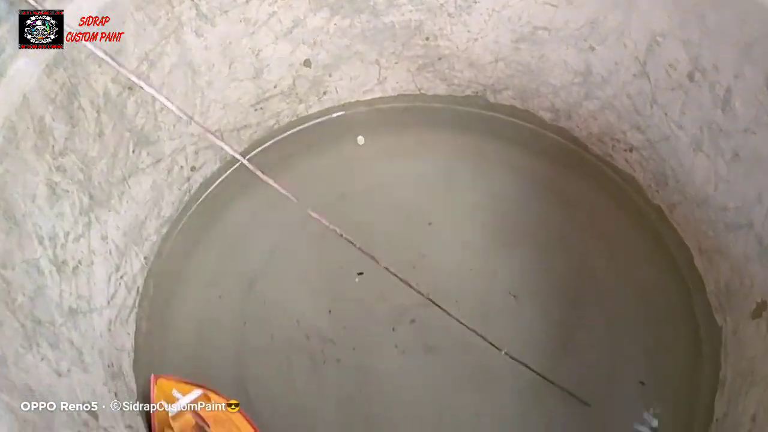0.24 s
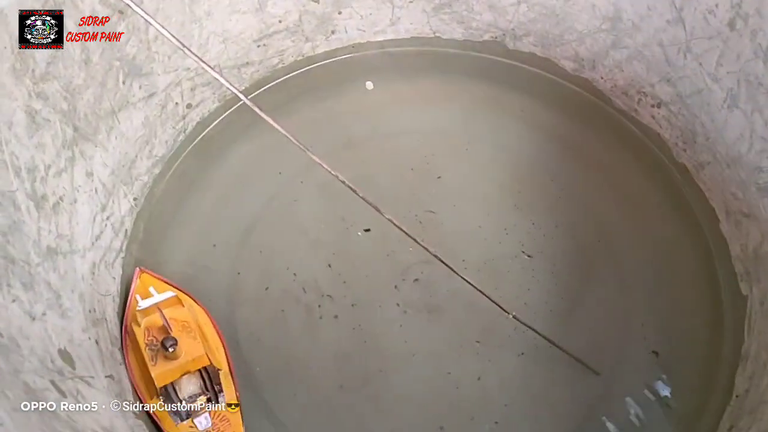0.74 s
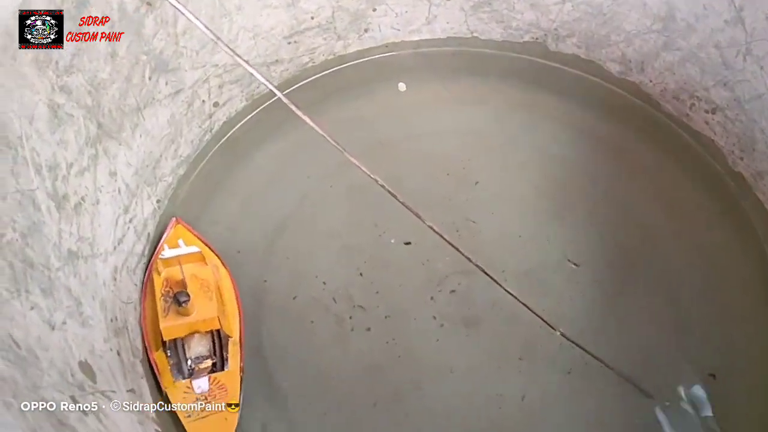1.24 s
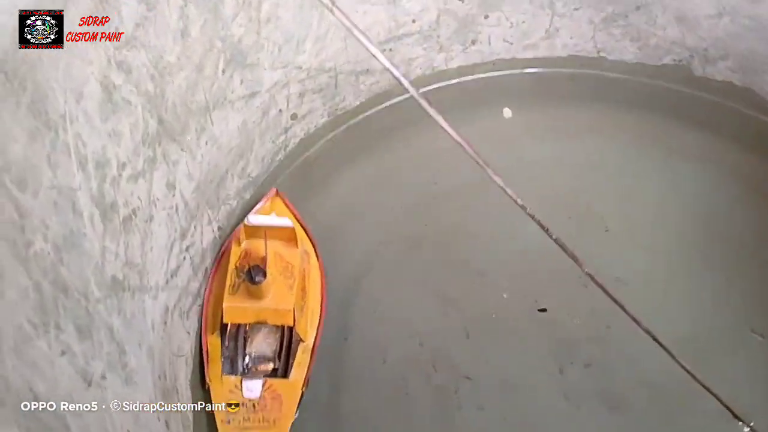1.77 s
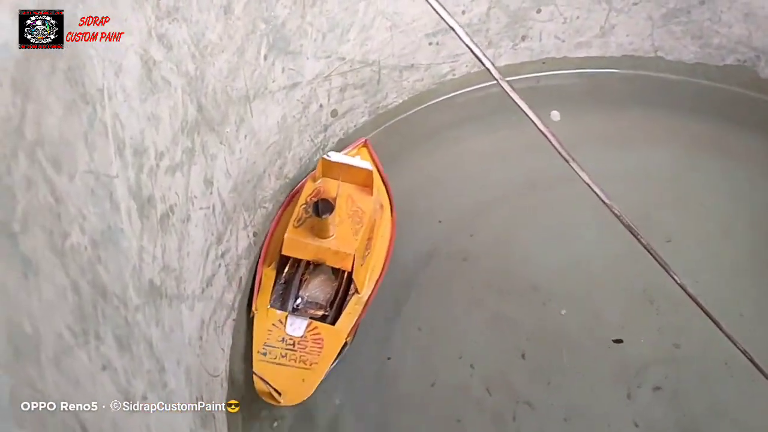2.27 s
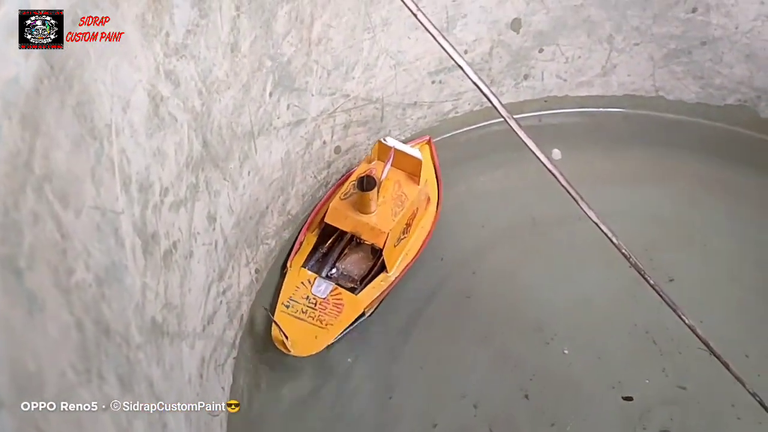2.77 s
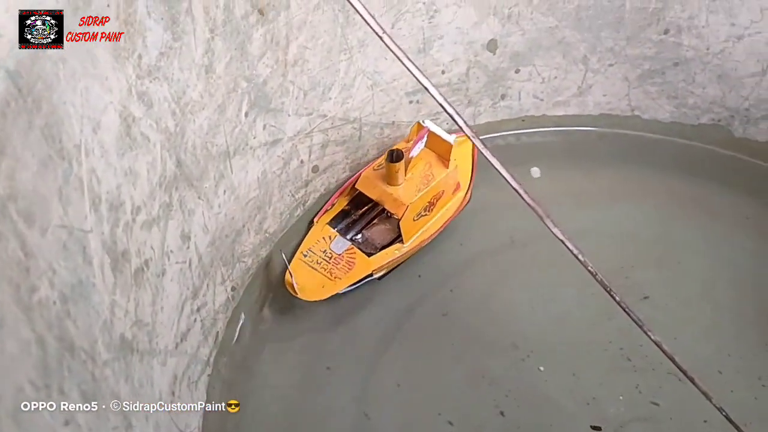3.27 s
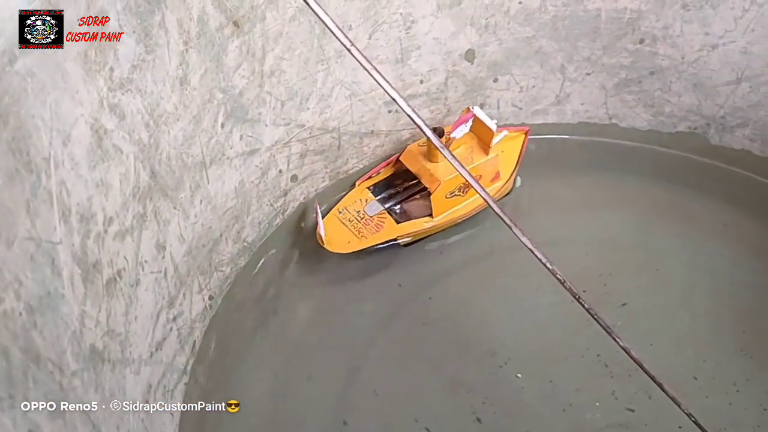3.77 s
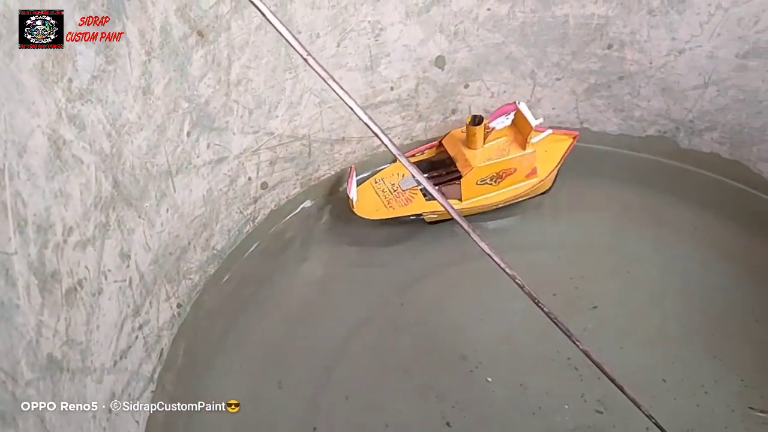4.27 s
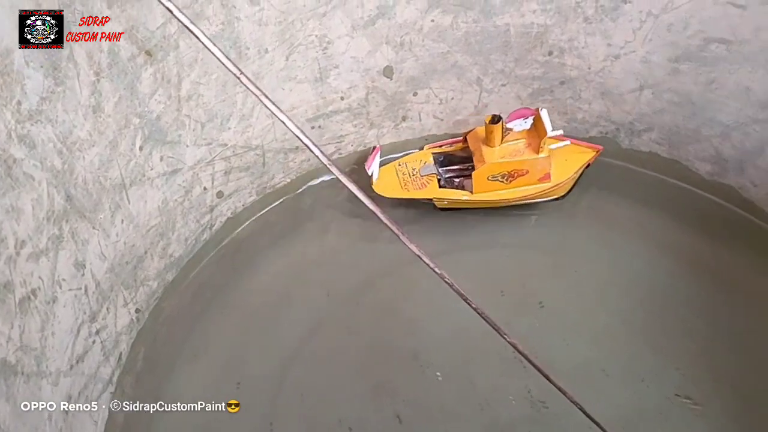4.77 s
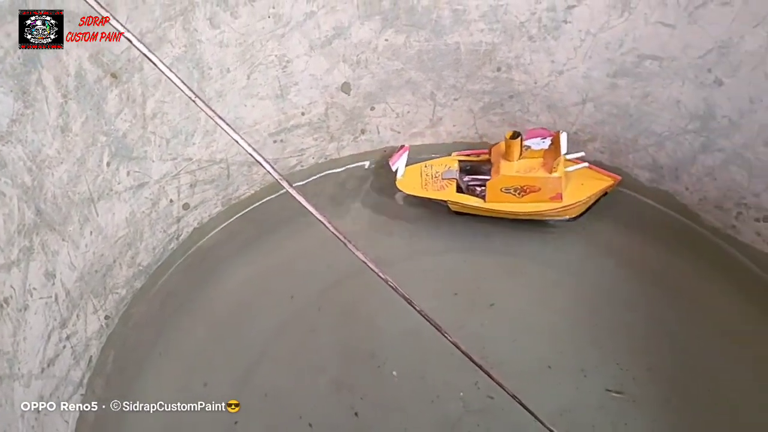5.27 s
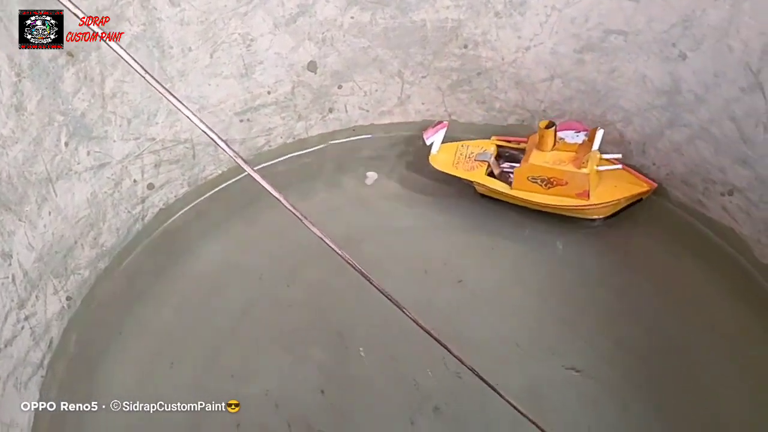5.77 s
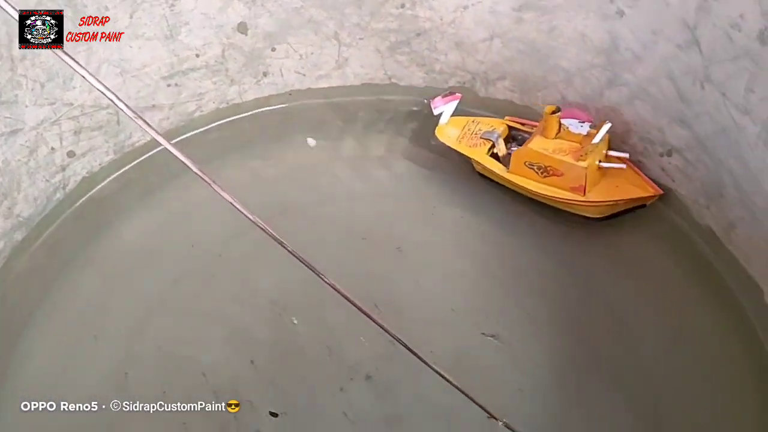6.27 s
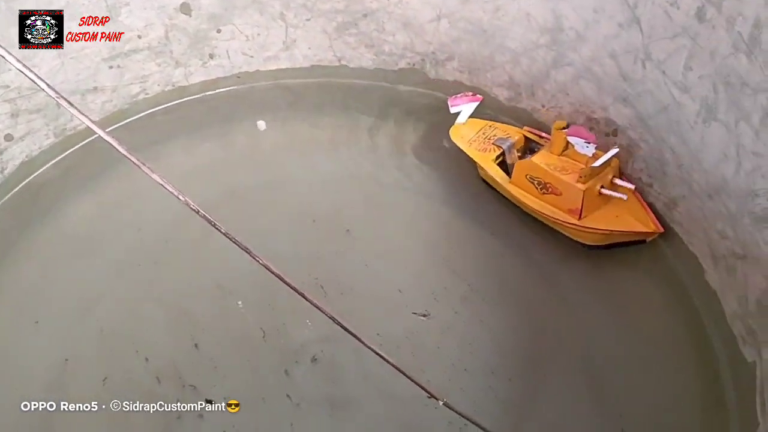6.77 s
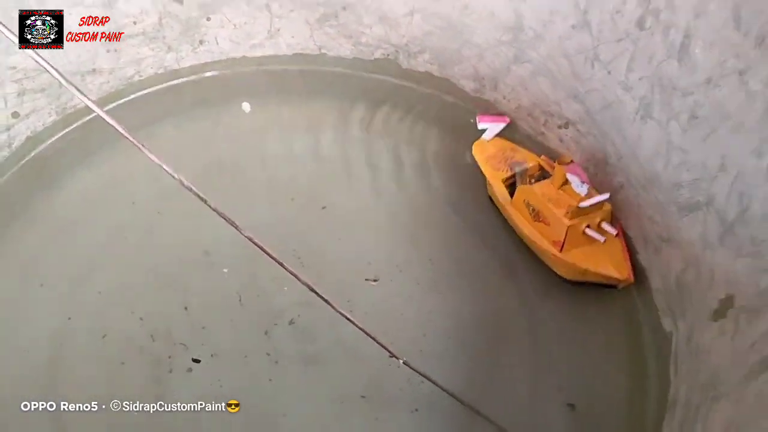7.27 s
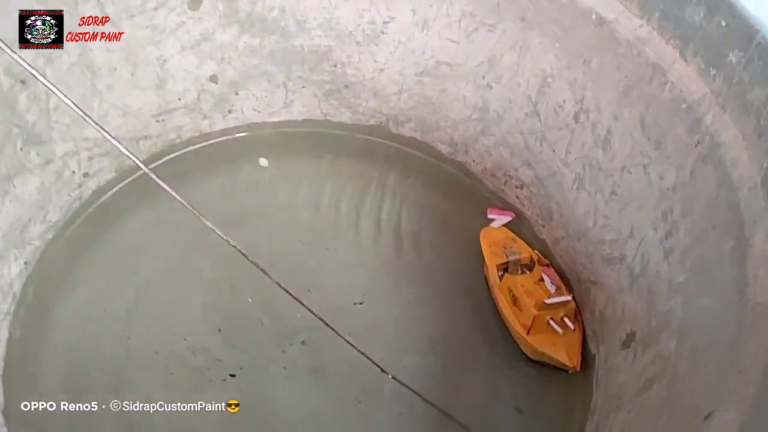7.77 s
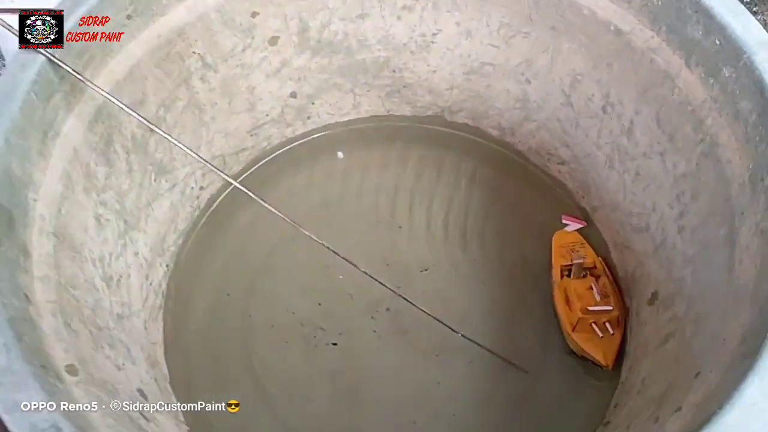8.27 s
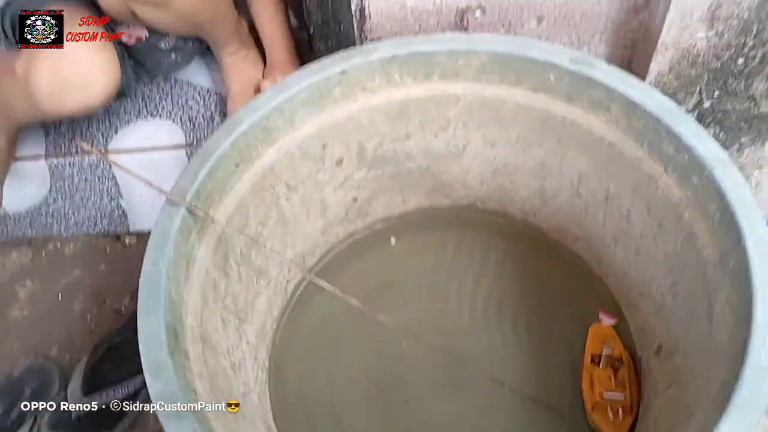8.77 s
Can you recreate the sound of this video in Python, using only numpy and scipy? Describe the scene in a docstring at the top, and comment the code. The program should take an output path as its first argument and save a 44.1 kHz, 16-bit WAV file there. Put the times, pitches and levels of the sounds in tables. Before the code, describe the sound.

A small tin toy steam boat pops rapidly round a tub of water, sharp metallic double clicks rattling, with soft ticks between and a final scuff.

```python
"""A tin pop-pop boat circles the rim of a plastic tub of water under a hand-held phone.
Its boiler's thin lid buckles out in two snaps and a rattle, ringing damped tin modes, with a buzz and a low gulp;
it ticks softly back as the steam condenses. The tub answers with decaying noise reflections.
Behind it a far engine hums in orders of its firing rate, shaped noise makes hiss, rush and rumble, and dull
bumps are short low tones. Noise on gliding tones makes rough far chirps, and a scuff of noise ends it."""
import sys
import numpy as np
from scipy import signal
from scipy.fft import rfft, irfft, next_fast_len
from scipy.io import wavfile
from scipy.ndimage import uniform_filter1d, minimum_filter1d, map_coordinates

SR = 44100
rng = np.random.default_rng(int(sys.argv[2]) if len(sys.argv) > 2 else 0)


def generate_wav(signal):
    """Clip the signal to [-1, 1] and save it as 16-bit WAV at the path in sys.argv[1]."""
    frames = np.transpose(np.atleast_2d(signal))
    scaled = np.clip(frames, -1, 1) * 32767
    pcm = np.round(scaled).astype(np.int16)
    wavfile.write(sys.argv[1], SR, pcm)


def boost(x):
    """Linear amplitude factor 10**(x/20) for a level x in decibels (scalar or array-like)."""
    u = np.asarray(x, float) / 20
    return 10 ** u


N = 398523  # length in samples


def unit(x):
    """Normalisation: scales a signal to rms 1."""
    return x / np.sqrt(np.mean(x ** 2) + 1e-20)


def along(points, hz):
    """Logarithmic pitch scale: interpolates (Hz, value) points along it."""
    point_hz, value = np.transpose(points)
    return np.interp(np.log(hz + 1), np.log(point_hz + 1), value)


def curves(rows, s):
    """Piecewise-linear motion: reads each column after the time at times s."""
    time, *columns = np.transpose(rows)
    return [np.interp(s, time, column) for column in columns]


def wobble(rate):
    """Slow random modulation: a smooth curve through `rate` random knots a second."""
    knots = rng.standard_normal(int(N * rate / SR) + 4)
    return map_coordinates(knots, [np.arange(N) * rate / SR])


def filtered(x, response):
    """Linear filtering: multiplies the spectrum of x by a response of frequency."""
    size = next_fast_len(N + 8192)
    spectrum = rfft(x, size) * response(np.fft.rfftfreq(size, 1 / SR))
    return irfft(spectrum, size)[..., :N]


def pair(gain, alike):
    """Interchannel coherence: stereo noise of rms 1 with a given spectrum and left-right likeness."""
    def response(hz):
        turn = np.arccos(np.clip(alike(hz), -1, 1)) / 2
        return gain(hz) * [np.cos(turn), np.sin(turn)]
    mid, side = filtered(rng.standard_normal((2, N)), response)
    return unit(np.array([mid + side, mid - side]))


def coloured(points, likeness):
    """Spectral shaping: stereo noise with a spectrum in dB and one likeness at all frequencies."""
    return pair(lambda hz: boost(along(points, hz)), lambda hz: likeness + 0 * hz)


def bell(x, centre, width):
    """Gaussian window, in frequency or in time."""
    return np.exp(-.5 * ((x - centre) / width) ** 2)


def add(x, start, piece):
    """Superposition: adds piece into x from sample start on."""
    x[start:start + len(piece)] += piece[:len(x) - start]


def burst(t, db, t60, rise_s):
    """Exponential decay: an envelope that falls 60 dB in t60 seconds after a soft onset."""
    return boost(db - 60 * t / t60) * (1 - np.exp(-t / rise_s))


# Coherence of the diffuse noise. Each row: frequency in Hz, left-right likeness from 0 to 1.
ALIKE = [(60, 0.63), (240, 1), (950, 0.22), (3770, 0.043), (15000, 0.017)]
# Swell of the hiss. Each row: time in seconds, level in dB before a common 5 dB lift.
AIR_LEVEL = [(0, -46.5), (.4, -47.5), (1, -52), (5, -52.5), (6, -48), (7, -54.5), (8.4, -51), (9.04, -42)]
# Spectrum of the hiss. Each row: frequency in Hz, relative level in dB per Hz.
HISS_SPECTRUM = [(120, -52), (200, -12), (986, -12.5), (2130, -6), (2960, -11), (4040, -7), (6760, -17.5),
                 (9400, -27), (13300, -28.5), (15100, -34), (16000, -70)]


def hiss(s):
    """Broadband noise: outdoor air hiss whose level wavers and whose channels agree only at low pitch."""
    level_db = curves(AIR_LEVEL, s)[0] + 5 + 1.7 * wobble(3.02)
    return boost(level_db) * pair(lambda hz: boost(along(HISS_SPECTRUM, hz)), lambda hz: along(ALIKE, hz))


# Swell of a far narrow rushing. Each row: time in seconds, rms level in dB.
WHIR_LEVEL = [(0, -47.5), (.5, -55), (1.8, -58), (3, -68), (9.04, -49)]


def whir(s):
    """Narrow-band noise: a far rushing near 2.2 kHz."""
    return boost(curves(WHIR_LEVEL, s)[0]) * pair(lambda hz: bell(hz, 2240, 150), lambda hz: along(ALIKE, hz))


# Far engine. Each row: time in seconds, firing rate in Hz, reference level of the low drone in dB,
# rms level of the fifth order in dB before it wavers.
ENGINE = [(0, 31.6, -63, -61.5), (.3, 30.7, -62, -55), (1.2, 31.4, -60.5, -60), (1.85, 32.5, -53.5, -60),
          (2.35, 32.75, -51.5, -61), (2.8, 33, -56, -59), (3.1, 33.5, -49, -64), (3.35, 33.3, -54.5, -56),
          (3.6, 34.1, -62, -61), (4.35, 34.4, -68.5, -63), (4.9, 34.1, -65, -60.5), (5.8, 31.6, -73, -69),
          (7.3, 31.23, -72, -74), (9.04, 31.37, -69, -64)]
# Low orders of the drone. Each row: multiple of the firing rate, level in dB over the drone reference.
ORDERS = [(1, -3), (2, -0.8), (4, -2.5)]


def engine(s):
    """Harmonic synthesis: wavering sines at whole multiples of the firing rate."""
    rate_hz, drone_db, fifth_db = curves(ENGINE, s)
    turn = 2 * np.pi * np.cumsum(rate_hz) / SR
    waver_db = 2.5
    tone = boost(fifth_db + waver_db * wobble(3)) * np.sqrt(2) * np.sin(5 * turn)
    for order, db in ORDERS:
        level = boost(drone_db + db + waver_db * wobble(3.3))
        tone = tone + level * np.sqrt(2) * np.sin(order * turn)
    return tone


# Spectrum of the rumble. Each row: frequency in Hz, relative level in dB per Hz.
RUMBLE_SPECTRUM = [(15, 4.5), (30, -1), (150, -5.5), (300, -9), (600, -36)]


def rumble(s):
    """Low-frequency noise: its level follows 0.65 of the engine drone's swing in dB."""
    drone_db = curves(ENGINE, s)[1]
    level_db = -56.5 + 0.65 * (drone_db + 61) + 2.7 * wobble(3.6)
    return boost(level_db) * coloured(RUMBLE_SPECTRUM, 0.83)


# Dull bumps on the phone. Each row: centre time in seconds, frequency in Hz, peak level in dB.
BUMPS = [(.93, 307, -48.5), (2.39, 146, -41), (5.95, 304, -49)]


def bumps(s):
    """Tone bursts: low sines under short Gaussian envelopes."""
    return sum(boost(db) * bell(s, at, 0.021) * np.sin(2 * np.pi * hz * s) for at, hz, db in BUMPS)


# Rough far chirps. Each row: start in seconds, end in seconds, first pitch in Hz, last pitch in Hz,
# bandwidth of the roughness in Hz, level in dB before a common 7 dB lift.
CHIRPS = [(1.543, 1.7, 7150, 6300, 500, -44), (1.912, 2.011, 6530, 5250, 700, -35),
          (4.27, 4.36, 2890, 2870, 90, -38.5), (4.28, 4.35, 5800, 5800, 90, -36),
          (4.266, 4.373, 11300, 11400, 198, -51.5), (4.271, 4.368, 3620, 4180, 700, -36),
          (4.295, 4.425, 6020, 6800, 600, -38), (4.328, 4.367, 6550, 6600, 100, -37.5),
          (6.894, 6.978, 5500, 6280, 700, -42)]


def chirps(s):
    """Amplitude modulation: low-passed noise rides on a gliding tone and roughens it."""
    out = np.zeros((2, N))
    for start, end, first_hz, last_hz, width_hz, db in CHIRPS:
        progress = np.clip((s - start) / (end - start), 0, 1)
        swell = (1 - np.exp(-progress / 0.022)) * (1 - progress) ** .5
        rough = pair(lambda hz: bell(hz, 0, width_hz), lambda hz: 0.19 + 0 * hz)
        phase = 2 * np.pi * np.cumsum(first_hz + (last_hz - first_hz) * progress) / SR
        out += boost(db + 7) * swell * rough * np.sin(phase)
    return out


# Envelope of the scuff, silent before the first row. Each row: time in seconds, level in dB before its lumps.
SCUFF_LEVEL = [(8.96, -58), (8.968, -20), (9.0, -24), (9.02, -25.5), (9.037, -30)]
# Colour of the scuff. Each row: frequency in Hz, relative level in dB per Hz.
SCUFF_SPECTRUM = [(180, -66), (300, -42), (1230, -6), (1460, -18), (2100, -3.5), (2880, -16), (4440, -6),
                  (8940, -29.5), (9710, -33), (13800, -33), (16000, -57)]


def scuff(s):
    """Friction noise: the rubbing catches unevenly, so its level is lumpy."""
    knots = rng.standard_normal(N // 150 + 4)
    lumps_db = 3 * map_coordinates(knots, [np.arange(N) / 150])
    level = boost(curves(SCUFF_LEVEL, s)[0] + lumps_db) * (s > SCUFF_LEVEL[0][0])
    return level * coloured(SCUFF_SPECTRUM, 0.57)


# Reverberation of the tub. Each row: frequency in Hz, decay time t60 in seconds.
TUB_DECAY = [(300, 0.027), (1500, 0.25), (4500, 0.26), (12000, 0.062)]


def tub(x):
    """Reverberation: convolution with noise that dies band by band, drawn anew each half second."""
    out, step = np.zeros((2, N)), SR // 2
    delay = 90  # samples, about 2 ms
    for start in range(0, N, step):
        hz, t, bands = signal.stft(rng.standard_normal((2, SR // 4)), SR, nperseg=256)
        decay = boost(-60 * t / along(TUB_DECAY, hz)[:, None])
        tail = signal.istft(bands * decay, SR, nperseg=256)[1]
        mono = x[:, start:start + step].mean(0)[None]
        wet = signal.fftconvolve(mono, tail / np.linalg.norm(tail[0]), axes=1)
        add(out[0], start + delay, wet[0])
        add(out[1], start + delay, wet[1])
    return out


# Dense weak tin modes. Each row: frequency in Hz, relative level in dB per Hz.
CRACK_SPECTRUM = [(180, -60), (300, -68), (494, -79), (603, -60), (762, -29), (1410, -7), (3400, -3.5),
                  (4300, 7), (4830, -17), (5610, -8), (9240, -34), (14000, -69), (16000, -58)]


def crack_grain():
    """High modal density: modes too close to tell apart are heard as shaped noise."""
    return unit(filtered(rng.standard_normal(N), lambda hz: boost(along(CRACK_SPECTRUM, hz))))


# Where the boat is. Each row: time in seconds, lag of the left port in ms, then left over right in dB
# for the low, the upper and the bright modes.
PLACE = [(.3, -0.14, 5, 10, -11.5), (1.1, -.2, 7, 19.5, -9), (1.7, -0.21, 4, 15.5, -5.5),
         (2.4, -.14, 1.5, 1, -25), (3.1, -.07, 0.5, 5.5, -18), (3.9, -.11, 3.5, -2, -20),
         (4.7, -.2, -5, 12.5, -13.5), (5.1, 0.044, 3, 5, -6.5), (5.5, .12, 0, -11, -21.5),
         (5.9, 0.28, 5, 2, -15), (6.3, .22, 4.5, 20, 8.5), (7.1, -0.081, 5, 4.5, 11.5),
         (7.5, -0.083, 6.5, 5, 3), (7.9, 0.098, 5, 13, 11), (8.7, 0.11, 2.5, 11.5, 3)]
# How strong each family sounds from there, before each event's offsets. Each row: time in seconds,
# then level over the low modes in dB of the upper modes, bright modes, hull boom and rattle.
COLOUR = [(.3, -6, -4, -33, -14.5), (1.3, -11, -4.5, -39, -14.5), (1.9, -6, -3.5, -38, -14.5),
          (2.5, -2.5, -13, -27, -15), (3.1, -5.5, -10, -26, -13), (3.9, -6, -13, -21, -19),
          (4.7, -7.5, -11.5, -19.5, -16), (5.1, -7, -8, -18, -18), (5.7, -4, -14, -18.5, -17),
          (6.3, -11, -7.5, -21.5, -14), (7.1, -3.5, -7.5, -23.5, -10), (7.6, -14, -5, -28, -12.5),
          (8.3, -8.5, -4, -40, -7.5), (8.7, -10.5, 2.5, -37, -7.5)]
# Tin modes by family. Each row: frequency in Hz before a small random stray, relative level in dB,
# decay time t60 in seconds.
BOOM = [(603, 8, .035)]
DEEP = [(970, 4.4, 0.022), (1070, 0.64, 0.027)]
LOW = [(1210, -11, 0.042), (1348, -7.5, 0.031), (1500, 9, .011), (1626, -11, 0.074)]
UPPER = [(1730, -1, 0.022), (1882, -9, 0.039), (2082, -7, 0.03)]
MIDDLE = [(2570, 3.5, 0.027), (2814, 2.4, 0.026), (3136, 0.67, 0.03)]
BRIGHT = [(3480, -8, 0.016), (3956, -5.5, 0.03), (4093, -4.5, 0.041), (4300, 4.5, 0.024), (4400, -8, 0.049),
          (4900, 4, 0.0055), (5500, -51, 0.0083), (5685, -6, 0.023), (6300, -13, 0.0073),
          (6800, -46, 0.034), (7440, -18, 0.031)]


def snap(out, grain, s, db, low_db, upper_db, bright_db, mains, scatter_db, crack_db):
    """Modal synthesis: one buckle rings all tin modes, heard by each port at its own strength and delay."""
    lag_ms, pan_low, pan_upper, pan_bright = curves(PLACE, s)
    place_db, _, boom_db, _ = curves(COLOUR, s)
    # each family: modes, gain in dB, left over right in dB
    families = [(BOOM, low_db + boom_db + 5.0, 0),
                (DEEP, low_db - 21.5, pan_low),
                (LOW + [(mains[0], -1.5, .03)], low_db, pan_low),
                (UPPER + [(mains[1], -3, .035)], place_db + upper_db, pan_upper),
                (MIDDLE, -18, pan_upper),
                (BRIGHT + [(mains[2], -1.5, .03)], bright_db, pan_bright)]
    rows = [(hz, level + gain, t60, pan) for modes, gain, pan in families for hz, level, t60 in modes]
    hz, level, t60, pan = np.transpose(rows)
    pitch_luck, level_luck, phase_luck = rng.standard_normal((3, len(hz)))
    t = np.arange(SR // 16) / SR
    pole = 2j * np.pi * hz * (1 + .004 * pitch_luck) - np.log(1000) / t60
    ring = np.exp(t * pole[:, None])
    pick = rng.integers(N - len(t))
    crack = burst(t, db + crack_db, 0.056, 0.0021) * grain[pick:pick + len(t)]
    rise = (1 - np.exp(-t / 0.0004)) ** 2  # the buckle takes a moment to run across the lid
    for port, side in enumerate((.5, -.5)):
        mode_db = db - 6.5 + level + side * pan + scatter_db * level_luck
        weight = boost(mode_db) * np.exp(.25j * phase_luck)
        start = round((s - .0011 + side * lag_ms / 1000) * SR)  # begins 1.1 ms ahead of the nominal time
        add(out[port], start, (weight @ ring).imag * rise + crack)


BRIGHT_SCATTER_DB = 2.5  # random spread of the bright ring between events


def buzz_burst(buzz, s, db, t60):
    """Envelope of buzzing edges: a quick creep up, then exponential decay."""
    add(buzz, round(s * SR), burst(np.arange(SR // 10) / SR, db, t60, .002))


def gulp(gulps, s, db):
    """Resonance: water sucked back into the pipes gulps at one low pitch."""
    t = np.arange(SR // 10) / SR
    add(gulps, round((s + .026) * SR), burst(t, db, 0.081, 0.0076) * np.sin(2 * np.pi * 443 * t))


# The lid settling back. Each row: time in seconds, relative level in dB, favoured pitch in Hz.
TICKS = [(0.3261, -15.5, 1410), (0.5826, -17, 1720), (0.6062, -28, 1740), (0.6322, -21, 1100),
         (0.7603, -17, 1480), (1.0119, -17.5, 1853), (1.0349, -22.5, 1770), (1.2528, -17, 1539),
         (1.2772, -25, 1500), (1.4346, -18.0, 1500), (1.6252, -15, 1915), (1.6517, -22.5, 1733),
         (1.8673, -12, 1880), (1.8925, -25, 1740), (1.988, -15, 1660), (2.0179, -21, 1456),
         (2.1084, -16.5, 1620), (2.1297, -24, 1668), (2.3002, -13.5, 1900), (2.4143, -18.5, 1270),
         (2.4361, -22, 1658), (2.54, -14, 1680), (2.5699, -21.0, 1440), (2.6386, -28.5, 1787),
         (2.7229, -22.5, 1658), (2.7383, -31, 1711), (2.89, -32, 1873), (2.8994, -15.5, 1238),
         (2.9174, -23, 1690), (3.0273, -15, 1630), (3.0527, -20, 1717), (3.0813, -22, 1152),
         (3.2096, -15.5, 1660), (3.2397, -25, 1733), (3.3313, -16, 1600), (3.3657, -22, 1720),
         (3.6369, -19, 1550), (3.6567, -22.5, 1650), (3.9417, -16, 1270), (3.9623, -22.5, 1668),
         (4.1062, -30, 1865), (4.6253, -15, 1800), (4.6482, -23, 1733), (4.8162, -18, 1600),
         (4.8403, -26.5, 1740), (5.1695, -15.5, 1210), (5.2947, -18.5, 1307), (5.3174, -26.5, 1640),
         (5.4147, -17.5, 1240), (5.4372, -26.5, 1415), (5.5462, -18, 1396), (5.7948, -16.5, 1440),
         (5.8206, -30, 1490), (5.9091, -14.5, 1240), (5.9325, -25, 1710), (6.6285, -28, 1431),
         (6.9663, -21.5, 1850), (6.9904, -27, 1770), (7.1534, -28, 1460), (7.1695, -29, 1706),
         (7.2714, -19, 1350), (7.2959, -24.5, 1740), (7.4039, -21, 1545), (7.4386, -25, 1514),
         (7.5149, -20.5, 1137), (7.645, -23.5, 1614), (7.6705, -26, 1710), (7.7671, -16, 1260),
         (7.8948, -19, 1636), (7.9169, -28, 1711), (8.0251, -23, 1390), (8.0534, -27, 1431),
         (8.1494, -22, 1399), (8.1732, -25.5, 1463), (8.462, -21.5, 1399), (8.5843, -20, 1433),
         (8.7055, -22.5, 1408), (8.8275, -17, 1360), (8.9552, -23, 1453)]


def ticks(out, buzz, grain, creaks):
    """Weak impulsive excitation: the lid settles back with soft ticks, creaks among them."""
    for s, db, hz in list(TICKS) + creaks:
        bright_db = curves(COLOUR, s)[1] - 0.1 + BRIGHT_SCATTER_DB * rng.standard_normal()
        snap(out, grain, s, db, 0, -1.5, bright_db, [hz, hz, 3940], scatter_db=4.5, crack_db=-19.0)
        buzz_burst(buzz, s, db - 20, 0.068)


# Pops of the lid. Each row: time of the first snap in seconds, its relative level in dB,
# wait for the second snap in ms, relative level of the second snap in dB.
POPS = [(0.2591, 3.5, 13.6, -1), (0.505, 2.5, 16, -2.5), (0.688, 1.5, 17.6, -3.5), (0.934, 0.5, 16, -2.5),
        (1.1797, 0.5, 16.9, -3), (1.3629, -0.5, 16.1, -3), (1.5455, -1.5, 17, -3), (1.7896, 0, 16.2, -3),
        (1.9151, 1.5, 14.1, -5.5), (2.0359, -1.5, 16.3, -5.5), (2.1578, -3, 17, -4.5),
        (2.222, -2, 15.4, -5.5), (2.3442, -3.5, 15.5, -6), (2.4659, -3, 15.5, -3),
        (2.588, -1.5, 16.7, -5.5), (2.6513, 0.5, 15.4, -6), (2.8321, -1.5, 16.8, -6.5),
        (2.9548, -2, 15.8, -7), (3.138, -1.5, 16, -5), (3.2599, -1, 15.8, -7.0), (3.3809, -3.5, 17.5, -6.5),
        (3.4444, -4, 15.7, -7), (3.5678, -3.5, 16.5, -7), (3.6891, -1.5, 17, -6.5),
        (3.752, -4.0, 15.5, -5.5), (3.875, -3, 15, -7), (3.9958, -1.5, 17.6, -6.0),
        (4.0594, -2.0, 14.2, -6), (4.1798, -2.5, 16.2, -6.5), (4.2432, -7, 15.2, -7.5),
        (4.3644, -4, 17.1, -5.5), (4.4274, -4.5, 15.3, -3), (4.549, -4, 16.3, -5.5), (4.67, -3.5, 17.9, -8),
        (4.7331, -4.5, 16.2, -4), (4.9157, -2.5, 18, -6.0), (4.9789, -4.5, 16.6, -7),
        (5.1019, -3.5, 17.1, -5), (5.2225, -2, 17.5, -4), (5.3475, -1.5, 14.8, -5.5), (5.4703, -2, 16, -8),
        (5.5915, -4, 17.6, -6.5), (5.6535, -3.5, 16.8, -4), (5.7169, -4, 15, -5.5),
        (5.8399, -3.5, 16.8, -5.5), (5.9618, -2.5, 18.0, -2), (6.0243, -3.5, 17.4, -5),
        (6.088, -3, 16.7, -5), (6.1525, -3, 13.3, -5), (6.2721, -2, 17.8, -9.5), (6.334, -3.5, 17.8, -6.5),
        (6.395, -3.5, 16.8, -5), (6.4587, -3.5, 15.7, -9), (6.5792, -5.5, 17, -8.5),
        (6.6419, -7, 16.6, -10.5), (6.764, -6, 18.6, -14), (6.8265, -8.5, 17.3, -12),
        (6.8898, -10, 16, -13.5), (7.0125, -8.5, 17.5, -11), (7.0778, -7.5, 14.6, -12),
        (7.203, -6.5, 14.2, -10), (7.3255, -4.5, 17.7, -11), (7.4481, -4, 17.3, -9), (7.5725, -4, 18, -9),
        (7.697, -6.5, 17.0, -7), (7.8225, -4.5, 16.6, -9.5), (7.9476, -4.0, 16.6, -9.0),
        (8.0713, -5, 17.8, -9.5), (8.1963, -4.5, 17.4, -10.5), (8.2634, -4.5, 13.4, -8),
        (8.3867, -5.0, 15.4, -9.5), (8.5091, -5, 18.4, -6.5), (8.6312, -3.5, 17.7, -7.5),
        (8.7553, -3.5, 17, -7.5), (8.88, -3.5, 16.7, -10.5)]
# Strongest mode of each family as heard from each place, before a random stray. Each row: time in seconds,
# low mode in Hz, upper mode in Hz, bright mode in Hz.
MAIN = [(.3, 1477, 1720, 4400), (1.1, 1490, 1790, 4150), (1.6, 1440, 1870, 4300), (2.3, 1460, 1840, 4320),
        (2.8, 1429, 1765, 4310), (4.3, 1453, 1743, 4334), (5.1, 1374, 1897, 4454), (5.6, 1387, 1894, 4390),
        (6.2, 1500, 1720, 4425), (6.7, 1470, 1890, 4370), (7.2, 1477, 1735, 4450), (7.9, 1435, 1730, 4374),
        (8.3, 1433, 1925, 4385), (8.7, 1475, 1793, 4360)]


def pops(out, buzz, gulps, grain):
    """Snap-through buckling: two snaps, the second richer in upper modes, then a rattle and a gulp."""
    wander = 0.011  # each buckle bends the lid differently: share by which the strongest modes stray
    rest_s, weak_db = .09, -27  # a full rattle needs this rest since the last; change in level without it
    faint_db = -19  # crack of both snaps
    rattled_s, creaks = -1, []
    for (s, db, wait_ms, second_db), luck in zip(POPS, rng.standard_normal((len(POPS), 11))):
        mains = np.array(curves(MAIN, s))
        second = s + wait_ms / 1000
        late = second + .0115
        bright_db, boom_db, rattle_db = curves(COLOUR, s)[1:]
        if s - rattled_s > rest_s:
            rattled_s = s
            # a faint early tick follows a full rattle
            creaks.append((s + .056 + .005 * luck[9], -34.5 + 3 * luck[10], mains[1]))
        else:
            rattle_db += weak_db
        first_bright_db = bright_db + BRIGHT_SCATTER_DB * luck[0]
        second_bright_db = bright_db + 4 + BRIGHT_SCATTER_DB * luck[4]
        snap(out, grain, s, db, 0, 0.55, first_bright_db, mains * (1 + wander * luck[1:4]),
             scatter_db=1.65, crack_db=faint_db)
        snap(out, grain, second, second_db, 0, 9.15, second_bright_db, mains * (1 + wander * luck[5:8]),
             scatter_db=2.17, crack_db=faint_db)
        # the thin rattle is mostly crack and bright ring
        snap(out, grain, late, db + rattle_db - 11.5, -28, -18, 10.1, [mains[0], mains[1], 3950],
             scatter_db=1.5, crack_db=7.0)
        buzz_burst(buzz, s, db - 21, 0.072)
        buzz_burst(buzz, second, second_db - 28.5, 0.079)
        buzz_burst(buzz, late - .006, db + rattle_db - 13, 0.1)
        gulp(gulps, s, db + .5 * rattle_db + boom_db - 2.0)  # loudest where the hull booms
    return creaks


# Thin tin edges buzzing. Each row: frequency in Hz, relative level in dB per Hz.
SIZZLE_SPECTRUM = [(2940, -12), (5000, -0.5), (5650, 0), (6290, -7.5), (7530, -10.5), (9280, -22),
                   (11400, -18.5), (12600, -21.5), (14100, -22), (15200, -34), (16000, -48)]


def boat():
    """Radiation efficiency: so small a lid hardly radiates low or very high tones, so its ring is band-passed."""
    ring, buzz, gulps = np.zeros((2, N)), np.zeros(N), np.zeros(N)
    grain = crack_grain()
    creaks = pops(ring, buzz, gulps, grain)
    ticks(ring, buzz, grain, creaks)
    lid_band = np.vstack([signal.butter(4, [800, 8000], "bandpass", fs=SR, output="sos"),
                          signal.butter(2, [670, 820], "bandstop", fs=SR, output="sos")])
    return signal.sosfilt(lid_band, ring) + gulps + buzz * coloured(SIZZLE_SPECTRUM, 0.29)


# Share of the walls' answer, greatest at the end as the phone draws back.
# Each row: time in seconds, level in dB.
WET = [(0, -10.5), (1.5, -13.5), (4.5, -12.5), (7.5, -10.5), (9.04, -6)]


def scene():
    """Superposition: the boat, its tub's reverberation and the surroundings."""
    s = np.arange(N) / SR
    tin = boat()
    walls = boost(curves(WET, s)[0]) * tub(tin)
    yard = hiss(s) + whir(s) + rumble(s) + engine(s) + bumps(s)
    return tin + walls + yard + chirps(s) + scuff(s)


def roll_off(x):
    """The treble ends steeply here."""
    return signal.sosfilt(signal.butter(12, 16460, fs=SR, output="sos"), x)


def record(dry):
    """Peak limiting: the phone ducks both ports together for the highest peaks."""
    needed = np.minimum(1, .95 / (np.abs(dry).max(0) + 1e-9))
    gain = uniform_filter1d(minimum_filter1d(needed, size=265), size=131)  # held, then smoothed, in samples
    return roll_off(dry * gain)


dry = scene()
out = record(dry)
generate_wav(out)
```